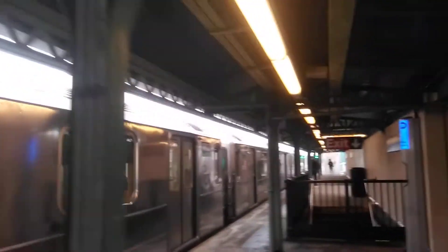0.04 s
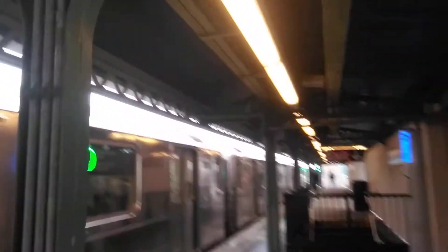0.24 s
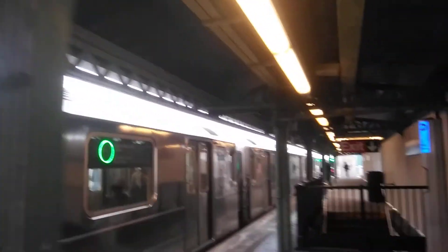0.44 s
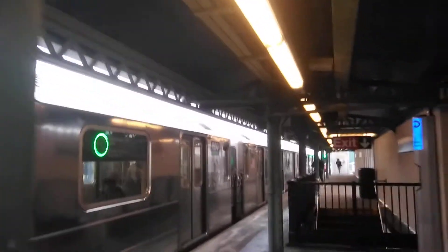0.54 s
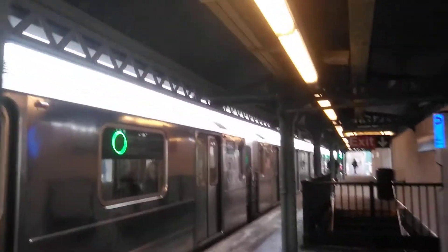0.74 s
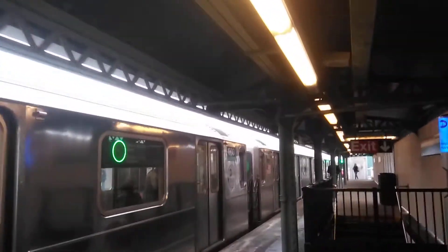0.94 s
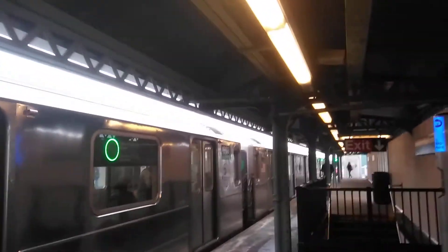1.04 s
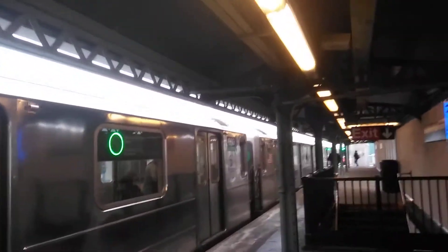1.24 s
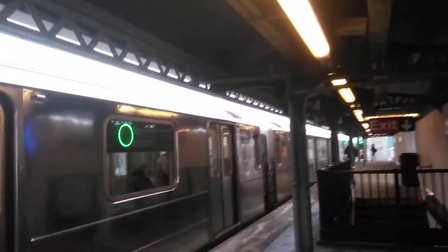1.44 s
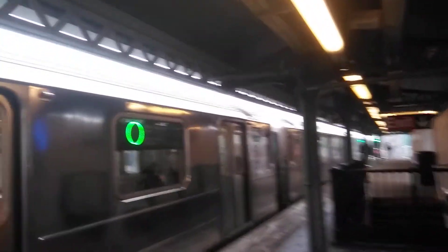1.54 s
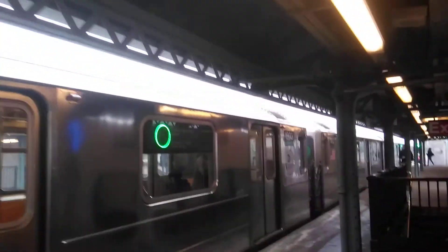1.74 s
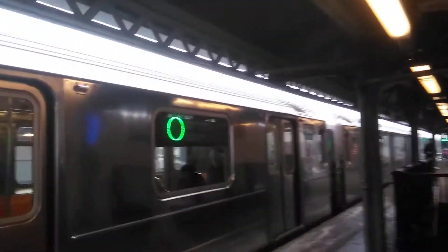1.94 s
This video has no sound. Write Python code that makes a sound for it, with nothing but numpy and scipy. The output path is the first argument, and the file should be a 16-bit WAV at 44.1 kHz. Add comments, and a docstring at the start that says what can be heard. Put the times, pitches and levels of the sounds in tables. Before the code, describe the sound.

Subway train brakes squeal: two dull rail knocks, then piercing, wavering metal tones with hiss, thinning to higher, fainter whines before a low beating groan fades. Close stereo microphones on a roofed platform, soft rumble beneath.

```python
"""A slowing train brakes beside a roofed platform, over the low rumble of its rolling.
First come two dull knocks of wheels on rail joints, and a brief tone dies away. Then the brake shoes hiss, and
rubbed steel wheels sing on their ring modes, one after another: wavering tones, some with overtones.
Reflections make each tone fade differently at the two microphones. Near the stop two low modes groan and beat,
and at last all sinks away. Rumble and hiss are shaped noise, and the knocks are short, dying rings."""
import sys
import numpy as np
from scipy import signal
from scipy.io import wavfile
from scipy.ndimage import uniform_filter1d

SR = 44100
rng = np.random.default_rng(int(sys.argv[2]) if len(sys.argv) > 2 else 0)


def wav_out(sig):
    """Save sig, one row per channel (or a flat mono array), as 16-bit PCM at SR to the path in sys.argv[1]."""
    wavfile.write(sys.argv[1], SR, np.round(np.clip(np.atleast_2d(sig).T, -1, 1) * 32767).astype(np.int16))


def boost(x):
    """Linear amplitude factor 10**(x/20) for a level x in decibels (scalar or array-like)."""
    u = np.asarray(x, float) / 20
    return 10 ** u


N = 85995  # length in samples


def evened(x):
    """Scales each row to an rms of 1."""
    return x / np.sqrt(np.mean(abs(x) ** 2, -1, keepdims=True) + 1e-20)


def read(points, hz):
    """Reads a curve between its points, on a logarithmic frequency scale."""
    f, value = np.transpose(points)
    return np.interp(np.log(hz + 1), np.log(f + 1), value)


def slow(per_s, count):
    """Complex noise with nothing much faster than per_s."""
    hz = np.fft.fftfreq(N, 1 / SR)
    z = rng.standard_normal((count, N)) + 1j * rng.standard_normal((count, N))
    return evened(np.fft.ifft(z / (1 + (hz / per_s) ** 4)))


def grip(points):
    """Gain at the left and right microphone as the wheel is gripped; short fades at the ends of the table."""
    s, db, pan_db = np.transpose(points)
    t = np.arange(N) / SR
    level = boost(np.interp(t, s, db))
    pan = boost(np.interp(t, s, pan_db))
    edge = np.clip(np.minimum(t - s[0] + .02, s[-1] + .04 - t) / .04, 0, 1)
    left_right = np.array([pan, 1 + 0 * pan]) * np.sqrt(2 / (1 + pan ** 2))  # panning keeps the total power
    return level * edge * left_right


def noise(field_db, hz, pan_db, patchy_db):
    """Random short-time spectra for two channels, with drifting patches and lasting narrow peaks."""
    # How alike the two channels are: f/Hz, likeness (0-1)
    likeness = [(60, 1), (250, 0.81), (600, 0.46), (2000, 0.037)]
    stripe_db = 5.0  # strength of narrow lasting peaks at random frequencies
    a, b, c, d, patches, stripes = rng.standard_normal((field_db.shape[1], len(hz), 6)).T
    stripes = uniform_filter1d(stripes, size=40, axis=1)
    patches = uniform_filter1d(uniform_filter1d(patches, size=10, axis=0), size=8, axis=1)
    same = np.clip(read(likeness, hz), 0, 1)[:, None]
    left = a + 1j * b
    right = same * left + np.sqrt(1 - same ** 2) * (c + 1j * d)
    z = np.array([left * boost(pan_db / 2), right / boost(pan_db / 2)])
    z *= boost(field_db + patchy_db * patches / patches.std() + stripe_db * stripes / stripes.std())
    return signal.istft(z, nperseg=1024, noverlap=768)[1][:, :N]


def levelled(colour_db, hz, band_hz):
    """Scales a colour so that the band has unit power."""
    inside = (hz > band_hz[0]) & (hz < band_hz[1])
    return colour_db - 10 * np.log10(np.sum(boost(colour_db[inside]) ** 2, 0))


def noise_grid():
    """Times (s) and frequencies (Hz) of the short-time spectra."""
    return np.arange(N // 256 + 5) * 256 / SR, np.fft.rfftfreq(1024, 1 / SR)


def singing_tone(pitch_hz, left_ahead, over_db, points):
    """A wavering tone with overtones; its phase and level drift apart in the two channels."""
    # Only the real part of the wobble and the drift is used: about 0.7 of these sizes
    wobble_hz, wobble_per_s = 6.74, 26
    drift_rad, drift_per_s = .4, 12
    scatter, scatter_per_s = .25, 22  # strength of reflections beside the direct sound, and their speed of change
    fuzz_db, fuzz_per_s = -17.5, 70
    t = np.arange(N) / SR
    hz = np.interp(t, np.linspace(points[0][0], points[-1][0], len(pitch_hz)), pitch_hz)
    turn = 2 * np.pi * np.cumsum(hz + wobble_hz * slow(wobble_per_s, count=1)[0].real) / SR
    gain = grip(points)
    force = (gain.max(0) / gain.max()) ** 0.11  # overtones grow faster than the tone
    # Half of the phase goes forward on the left, half backward on the right
    phase = np.array([[.5], [-.5]]) * np.interp(t, *np.transpose(left_ahead))
    out = 0
    for k, db in enumerate([0] + list(over_db)):
        drift = drift_rad * slow(drift_per_s, count=2).real
        direct = np.exp(1j * (phase + drift))
        paths = direct + scatter * np.sqrt(k + 1) * slow(scatter_per_s * (k + 1), count=2)
        paths += boost(fuzz_db) * slow(fuzz_per_s, count=2)
        out = out + boost(db) * force ** k * (paths * np.exp(1j * (k + 1) * turn)).real
    return out * gain * np.sqrt(2 / (1 + scatter ** 2))


def rumble():
    """The train rolling on the steel deck: mostly low noise whose level follows a table."""
    # Course of the rumble: t/s, level/dB of its 400-900 Hz band before patches and peaks
    course = [(0, -48), (.12, -56), (.75, -55), (1.2, -58), (1.55, -53), (1.95, -57)]
    # Colour of the rumble: f/Hz, relative level per Hz/dB
    rolling_colour = [(30, -22), (50, 11.5), (100, -6), (175, 5), (350, 0.5), (800, -8), (2000, -16),
                      (9000, -31.5), (16000, -48)]
    t, hz = noise_grid()
    colour_db = levelled(read(rolling_colour, hz), hz, band_hz=(400, 900))[:, None]
    return noise(colour_db + np.interp(t, *np.transpose(course)), hz, pan_db=0, patchy_db=2.5)


def brake_hiss():
    """Shoes rubbing on treads: noise that moves from a bright to a dull colour."""
    # Course of the hiss: t/s, level/dB of its 4400-5400 Hz band before patches and peaks,
    # share of the duller colour (0-1)
    course = [(0, -61, 0), (0.142, -70.5, 0), (0.228, -43, 0), (.3, -37.5, 0.01), (.42, -36, 0.22),
              (.47, -37, 0.06), (.62, -44.5, 0.11), (.75, -38.5, 0.44), (1.2, -43.5, 0.33),
              (1.3, -41, 0.88), (1.62, -44.5, 0.96), (1.72, -58, 1), (1.95, -71.5, 1)]
    # The brighter and the duller colour: f/Hz, relative level per Hz/dB
    bright = [(700, -25.5), (1100, -23.5), (1500, -6), (2100, -7.5), (2600, -6.5), (4800, -1), (8500, -10),
              (15800, -14)]
    dull = [(700, -5.5), (1100, -13), (2200, -4), (2850, -17.5), (4200, 5.5), (5600, -8), (6800, -33),
            (8400, -17), (15800, -52)]
    # Balance of the hiss: f/Hz, left minus right level/dB
    balance = [(1500, -2), (3000, 3.5), (6000, -10.5), (12000, -5.5)]
    t, hz = noise_grid()
    s, db, dull_share = np.transpose(course)
    share = np.clip(np.interp(t, s, dull_share), 0, 1)
    colour_db = (1 - share) * read(bright, hz)[:, None] + share * read(dull, hz)[:, None]
    hiss_db = levelled(colour_db, hz, band_hz=(4400, 5400)) + np.interp(t, s, db)
    return noise(hiss_db, hz, read(balance, hz)[:, None], patchy_db=2.5)


def knocks():
    """Wheels on rail joints: each knock rings the low modes of rail and deck."""
    # The knocks: t/s, strength level/dB
    hits = [(0.014, -32.5), (0.069, -37)]
    # Ring modes: f/Hz, level/dB beside the knock's strength, time to fall by 60 dB/s
    modes = [(169, 4.5, 0.13), (234.4, -8.5, 0.18), (416, -7, 0.039)]
    t = np.arange(8000) / SR
    train = np.zeros(N)
    for s, db in hits:
        train[round(s * SR)] = boost(db)
    ring = sum(boost(db - 60 * t / t60) * np.sin(2 * np.pi * hz * t) for hz, db, t60 in modes)
    soft_start = np.minimum(t / 0.0078, 1)
    return signal.oaconvolve(train, ring * soft_start)[:N]


def faint_tone(peak_s, rise_s, fall_s, hz, db):
    """A weak tone that swells and dies, 16 dB each way, louder on the right."""
    low_db, pan_db, left_ahead_rad = db - 16, -6, 2.4
    swell = [(peak_s - rise_s, low_db, pan_db), (peak_s, db, pan_db), (peak_s + fall_s, low_db, pan_db)]
    return singing_tone([hz], [(0, left_ahead_rad)], [], swell)


def faint_tones():
    """All the weak tones together."""
    # Weak tones: peak t/s, rise/s, fall/s, f/Hz, peak level/dB
    swells = [(1.05, .25, .4, 3456, -45), (.7, .08, .12, 1445, -34), (.74, .15, .2, 4135, -28),
              (1.0, 1.5, .5, 15030, -63)]
    return sum(faint_tone(*row) for row in swells)


def groan():
    """Two close low modes beat against each other, each with a blurred overtone, inside a rough skirt."""
    # Lower and upper mode: t/s, level/dB, left minus right level/dB
    lower_mode = [(.6, -66, 2), (.755, -35.5, -28), (.85, -48, 6), (1.0, -35.5, 14), (1.12, -42.5, -9),
                  (1.25, -33, 6), (1.501, -20, 3), (1.58, -20.5, 12), (1.7, -31.5, -11.5),
                  (1.801, -31.5, 1), (1.825, -57, -5)]
    upper_mode = [(1.15, -44, 9), (1.438, -22.5, -2), (1.6, -23, -8), (1.681, -26.5, -4), (1.8, -53, 3)]
    lower_hz, upper_hz, sagged_hz = 302.4, 318.63, 314.2
    sag_s, in_step_s = 1.61, 1.517  # when the upper pitch drops; moment from which both count their turns
    right_ahead_rad, overtone_db = 0.75, -31.5
    t = np.arange(N) / SR
    phase = np.exp(1j * right_ahead_rad * np.array([[0], [1]]))
    lower_turns = lower_hz * (t - in_step_s)
    upper_turns = upper_hz * (t - in_step_s) + (sagged_hz - upper_hz) * np.maximum(t - sag_s, 0)
    out = 0
    for turns, points in ((lower_turns, lower_mode), (upper_turns, upper_mode)):
        tone = np.exp(2j * np.pi * turns)
        rough = 1 + 0.21 * slow(23.0, count=2) + boost(-22.5) * slow(155.0, count=2)
        overtone = boost(overtone_db) * slow(30.0, count=2) * tone ** 2
        out = out + grip(points) * (phase * rough * tone + overtone)
    return np.sqrt(2) * out.real


def squeals():
    """Rubbed steel wheels sing on their ring modes, one after another."""
    # Each squeal: levels of overtones 2, 3, ../dB beside the tone at its loudest,
    # then its grip: t/s, level/dB, left minus right level/dB
    grips = [ ([-18.5, -24], [(0.17, -63, -16), (0.215, -22, 4.5), (0.255, -11.5, -14), (0.3, -13.5, -1.5),
             (.32, -7, 4), (.35, -10.5, 17.5), (.38, -12, 2), (.435, -12.5, -6), (.465, -21, -4),
             (0.495, -13.5, -3.5), (0.534, -33.5, -5), (0.569, -31.5, -4.5), (.635, -8, -7), (.66, -11, 0),
             (.68, -17.5, -20), (.72, -7, -1), (.78, -15, -11), (.797, -18.5, 1), (.82, -19, 2),
             (.875, -27.5, 2.5), (.91, -27, 10.5), (1.098, -28, -2), (1.297, -50, -6)]), ([],
             [(.95, -36, 7), (1.12, -33, 6), (1.3, -48, 2), (1.5, -44, 10.5), (1.94, -65, -10)]),
             ([-11, -19.5], [(0.12, -49, -9), (0.24, -32.5, 1), (0.285, -24, -23), (0.345, -17, -17),
             (0.394, -32, -2), (0.913, -46.5, -25)]), ([-6], [(0.28, -49, 2), (0.37, -37, 7),
             (0.385, -12, -12), (0.44, -13, 0), (0.5, -14, -8.5), (0.519, -12, -24), (0.544, -18.5, -14),
             (0.744, -39.5, -3), (1.033, -50, -15)]), ([], [(0.68, -41, -12), (0.9, -23, -10.5),
             (0.95, -31, -7), (0.989, -13.5, -14), (1.029, -26.5, -16), (1.054, -21, -8), (1.084, -29, -15),
             (1.104, -19.5, -3), (1.134, -21, 7), (1.234, -36, 5), (1.259, -21.5, -20), (1.34, -38.5, -3),
             (1.4, -32.5, -2), (1.543, -31, -11), (1.7, -49.5, -4.5), (1.937, -62.5, -15)]), ([],
             [(0.66, -47, 6), (0.894, -28.5, -6.5), (0.909, -12.5, -4), (0.954, -33, -19),
             (0.989, -23.5, 4.5), (1.064, -19.5, -10.5), (1.179, -29.5, -6), (1.239, -21, -14),
             (1.254, -33, -15), (1.304, -26.5, 3), (1.42, -29.5, -4.5), (1.78, -55, -14),
             (1.937, -72, -21)]), ([-9], [(0.25, -52, -18), (0.41, -42, 10), (0.45, -32, -34),
             (0.525, -27, -4), (0.65, -39, 0), (0.909, -33, -13), (0.948, -39.5, -5.5), (1.173, -32, 12),
             (1.218, -44, 4), (1.343, -34, -10), (1.687, -43, 14), (1.936, -65, -12)]), ([], [(1.0, -86, 3),
             (1.2, -36.5, -0.5), (1.5, -39, -2), (1.66, -38.5, -2.5), (1.94, -73.5, -4)]), ([-8],
             [(.83, -52, -2), (.93, -34, -26), (1.05, -34.5, -7), (1.37, -60.5, 2)]), ([],
             [(1.05, -43.5, -10), (1.33, -33.5, -6), (1.42, -34, -28), (1.7, -61, -25)]), ([-12],
             [(0, -24, -30), (.03, -48, -27), (.09, -48.5, -6), (.24, -35.5, 3)]), ]
    # Pitch of each squeal from its start to its end, at even steps: f/Hz
    pitches = [(1370, 1368, 1376, 1379, 1382), (1410, 1418, 1450), (2586, 2592), (2688, 2694),
               (3186, 3190, 3190, 3225, 3250), (3742, 3762, 3787, 3798), (2036, 2036, 2031), (2112, 2080),
               (2856, 2860), (4215, 4175), (2516, 2525)]
    # Phase of the left channel ahead of the right, for each squeal: t/s, phase/rad
    phases = [[(.2, 1.2), (.27, 3.7), (.345, 3.4), (.375, 1.2), (.48, 4), (.59, 2.6), (.63, .6), (.67, .8),
              (.7, 4.4), (.8, 3)], [(1, 2)], [(.3, -1)], [(.38, 4), (.49, 1.8), (.53, 4.8)], [(.94, 3),
              (1.02, 5.2)], [(1.16, 2.3), (1.2, 0)]] + 5 * [[(1, 1.5)]]
    return sum(singing_tone(hz, ahead, *row) for hz, ahead, row in zip(pitches, phases, grips))


def scene():
    """Adds up all sources at the two microphones."""
    return rumble() + brake_hiss() + knocks() + faint_tones() + groan() + squeals()


def roll_off(x):
    """The treble ends steeply here."""
    return signal.sosfilt(signal.butter(12, 15910, fs=SR, output="sos"), x)


def record(dry):
    """The microphone loses the lowest bass, and the input stage rounds off the highest peaks."""
    limit = 1  # full scale
    no_bass = signal.sosfilt(signal.butter(3, 42, "high", fs=SR, output="sos"), dry)
    rounded = no_bass / (1 + (no_bass / limit) ** 6) ** (1 / 6)
    return roll_off(rounded)


dry = scene()
out = record(dry)
wav_out(out)
```